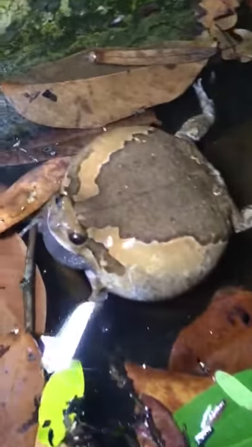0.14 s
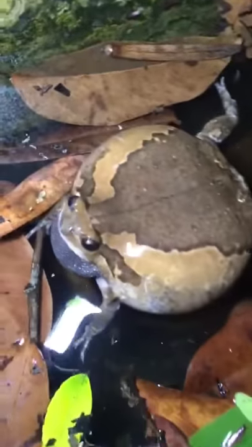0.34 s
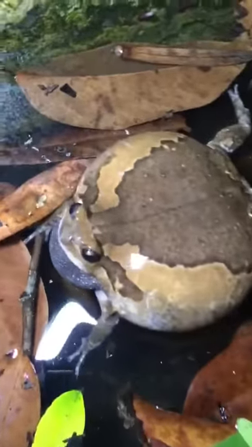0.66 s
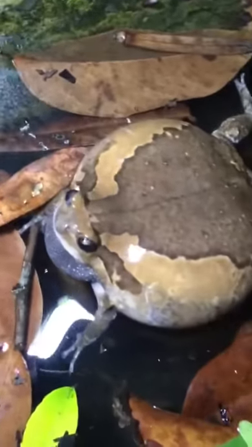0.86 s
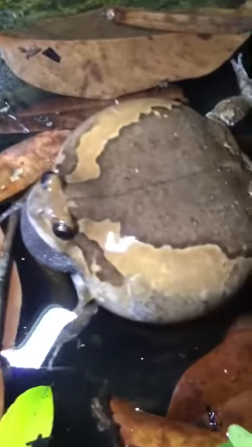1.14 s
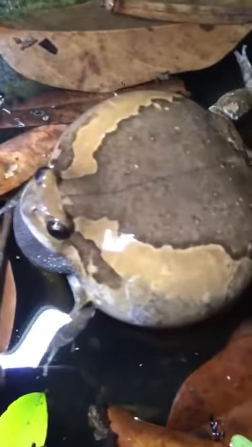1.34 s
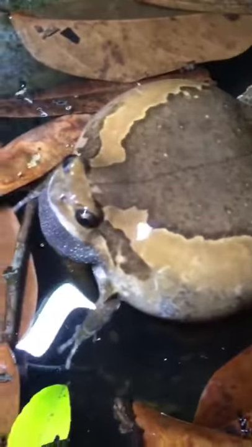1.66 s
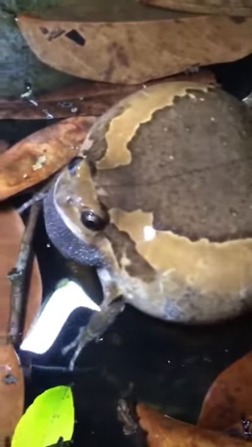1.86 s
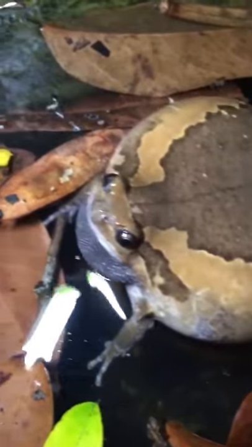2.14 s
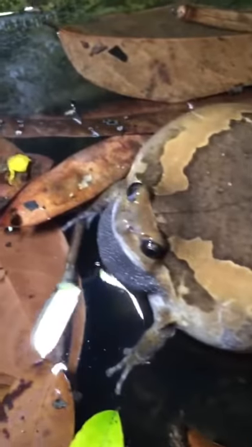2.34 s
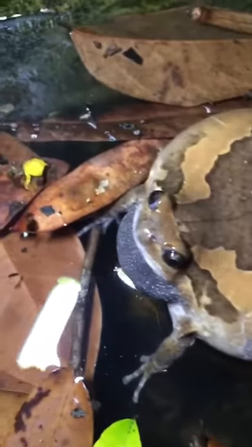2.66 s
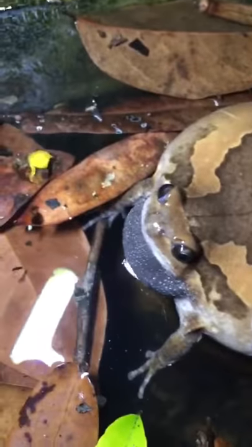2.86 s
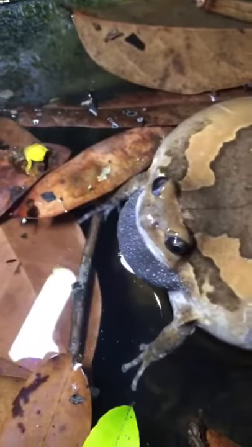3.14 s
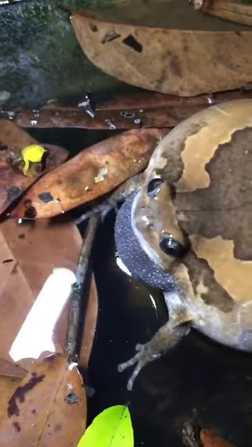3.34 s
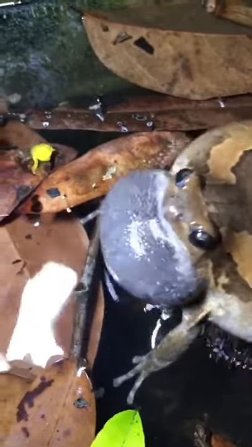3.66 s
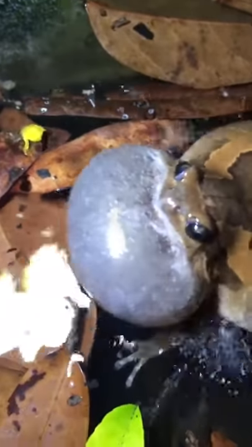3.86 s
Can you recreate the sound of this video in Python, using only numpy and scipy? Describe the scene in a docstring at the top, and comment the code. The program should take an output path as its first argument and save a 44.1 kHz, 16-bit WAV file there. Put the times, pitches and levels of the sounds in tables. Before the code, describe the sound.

Several frogs bellow in turn around a pond at night, their deep drones overlapping over a steady high insect hiss. Near the end, one frog right by the microphone joins with a louder call that turns to a rattle.

```python
"""Bullfrog pond at night

Bullfrogs bellow in turn, larynx pulses driving their vocal sacs into drones that overlap and beat.
At the end a frog right up close inflates its sac and joins in, breaking into a half-rate rattle.
Shrill insects hiss throughout, with one close trill and a few faint falling whistles.
Low gulps, wet ticks, leaf rustles and a far frog chorus sit behind, on a bed of night air."""
import sys
import numpy as np
from scipy import signal
from scipy.io import wavfile
from scipy.ndimage import uniform_filter1d, minimum_filter1d

SR = 44100
rng = np.random.default_rng(int(sys.argv[2]) if len(sys.argv) > 2 else 0)


def master(y):
    """Save y as 16-bit WAV."""
    cut = np.clip(np.atleast_2d(y).T, -1, 1)
    pcm = np.round(cut * 32767)  # scale
    wavfile.write(sys.argv[1], SR, pcm.astype(np.int16))


N = 176400

# The neighbours' calls: drone_db, chest_db, buzz_db, treble_db, ring_db, ring_first_hz, ring_last_hz,
# then a path of (time_s, pulse_rate_hz, effort_db)
BELLOWS = [ (-33.5, -74, -52, -73, 14, 1300, 1327, [(-.1, 138.6, -3), (.1, 140.7, 3.5), (.29, 140.6, -1)]),
           (-32, -47.5, -45.5, -65, 22.5, 1156, 1173, [(-.1, 133.3, -4.5), (.1, 136.2, -3.5),
           (.29, 141.3, -5.5)]), (-33, -41, -42, -71, 21.5, 1411, 1440, [(.24, 120.8, -18), (.4, 123.9, -4),
           (.57, 121.7, -4), (.75, 123.7, -2.5), (1, 129.4, -7)]),
           (-49, -53, -40.5, -74, 2, 2000, 1600, [(.5, 126.7, -0.5), (.65, 125.1, -2.5), (.85, 126.4, -1.5),
           (1.1, 127.6, 5)]), (-35.5, -49.5, -32.5, -73, 10.5, 1760, 1480, [(.68, 139.8, -5.5),
           (.9, 137.5, -3), (1.03, 139.2, -1), (1.15, 143.8, -4), (1.32, 153, -24)]),
           (-25.5, -39, -31.5, -39, 7.5, 1600, 1360, [(.99, 134.8, -6), (1.15, 132.5, 0), (1.24, 132.7, 1),
           (1.36, 135.2, 1.5), (1.5, 138.6, -2), (1.68, 141.8, -11)]),
           (-25, -40, -36, -42, 12, 1330, 1360, [(1.24, 129.3, -3), (1.45, 126.7, 1), (1.62, 129.9, 0),
           (1.78, 134.6, -1.5), (1.94, 135.5, -13)]),
           (-33.5, -52, -47, -84, 13.5, 1340, 1380, [(1.68, 128.8, 4.5), (1.87, 129.1, 3.5),
           (1.98, 124.1, 1.5), (2.22, 126.2, 0)]), (-20, -33, -32, -55, 14, 1415, 1400, [(2.02, 133.8, -9),
           (2.12, 136.2, -4), (2.22, 135.9, 1.5), (2.33, 135.6, 2), (2.5, 139, -.5), (2.65, 143.5, -3),
           (2.76, 147, -10)]), (-30, -40.5, -39.5, -61.5, -5, 1500, 1300, [(2.2, 133.8, 1),
           (2.47, 130.5, -3), (2.72, 132.4, 7.5), (2.92, 135.2, 1.5), (3.12, 136.4, -20)]),
           (-24, -32.5, -33, -43, 3, 1234, 1343, [(2.62, 143.8, -19), (2.7, 142, 0.5), (2.9, 137.8, 1),
           (3.08, 138.9, 1), (3.25, 138.4, -0.5)]),
           (-28, -41.5, -33, -45, 13.5, 1410, 1400, [(2.56, 123.7, -11.5), (2.8, 122.3, 0.5),
           (3.03, 123.6, -1.5), (3.2, 127.2, -4), (3.42, 132.1, -7.5), (3.56, 128.1, -11.5)]),
           (-32, -41, -36.5, -51.5, 5, 1350, 1350, [(3.05, 121, -24), (3.22, 120, -0.5),
           (3.58, 123.8, -2.5)]), (-28.5, -40, -35, -66, -0.5, 1600, 1580, [(3.1, 129, -32.5),
           (3.28, 136.5, -1.5), (3.38, 140, 2), (3.56, 135.7, -1)]), ]
# EQ of a bellow's sac drone, chest and nasal buzz: frequency_hz, gain_db
DRONE_EQ = [(60, -69), (135, -40), (235, 4.5), (280, -1.5), (400, -12.5), (520, -29.5), (800, -67.5)]
CHEST_EQ = [(130, -35.5), (270, -20), (400, -11.5), (540, -4.5), (640, -2.5), (760, 0.5), (950, 4),
            (1100, -5), (1300, -11.5), (2000, -25), (5000, -63)]
BUZZ_EQ = [(200, -52.5), (650, -30.5), (950, -3.5), (1200, 2), (1600, -0.5), (1900, -13.5), (2350, -16.5),
           (3000, -38), (4200, -48), (7000, -76)]
# The near frog's pitch: time_s, pulse_rate_hz
NEAR_PITCH = [(3.5, 102.5), (3.55, 114.6), (3.61, 125.4), (3.72, 127.6), (3.8, 126), (3.9, 127.1),
              (4.05, 124.7)]
# Faders on its layers: time_s, sac_db, chest_db, buzz_db
NEAR_FADERS = [(3.5, -43, -41.5, -59), (3.56, -14, -29, -39), (3.61, -13, -23, -29),
               (3.67, -12, -23.5, -25), (3.735, -8, -23, -23.5), (3.8, -9, -26.5, -27),
               (3.86, -9, -29, -26), (4.05, -11, -39, -25.5)]
# Fader on its nasal ring: time_s, gain_db
NEAR_RING_FADER = [(3.6, -54), (3.7, -28), (3.76, -17.5), (3.83, -17), (3.9, -23), (4, -33)]
# EQ of its sac, chest and buzz: frequency_hz, gain_db
NEAR_SAC_EQ = [(60, -39), (135, -32), (240, 1.5), (400, 9), (700, -16.5), (1500, -40.5), (4000, -74)]
NEAR_CHEST_EQ = [(60, -46), (135, -34), (300, 19), (400, 1.5), (620, 3), (900, -2), (1200, -11.5),
                 (1600, -4.5), (2000, -13.5), (3000, -50), (7000, -53.5)]
NEAR_BUZZ_EQ = [(100, -34), (600, 1), (1000, -5.5), (1300, 6.5), (1420, 6.5), (1550, 1.5), (1720, -10),
                (1920, -6), (2300, -20), (3000, -26.5), (4000, -41.5), (5500, -23.5), (8000, -55),
                (12000, -41), (16000, -60.5)]
# The close insect trill: time_s, pitch_hz, level_db
TRILL = [(.495, 4270, -33.5), (.515, 5300, -25), (.55, 5660, -23), (.62, 5840, -23.5), (.75, 5850, -25.5),
         (.92, 5780, -26), (.935, 6026, -40)]
# Thin whistles, and low gulps as a sac deflates:
# start_s, length_s, first_hz, last_hz, fall_s, level_db, octave_db
WHISTLES = [(1.42, 0.12, 8300, 7040, 0.037, -50.5, -16), (2.192, 0.47, 8700, 7200, .04, -51.5, -10),
            (3.723, 0.57, 10700, 6500, 0.15, -49.5, -30), (3.776, 0.28, 12900, 8200, 0.16, -58, -34)]
GULPS = [(.25, 0.086, 261, 60.6, 0.062, -41, -29), (2.8, .09, 230, 90, .07, -45, -20)]
# Tiny wet ticks: start_s, level_db
TICKS = [(0.577, -41), (.602, -38), (.627, -42), (0.662, -44), (0.699, -44), (0.756, -41)]
# Rustles in the leaves: start_s, length_s, level_db
RUSTLES = [(0.154, 0.12, -56), (0.292, 0.15, -48), (0.474, 0.11, -40), (0.655, 0.13, -43),
           (1.91, 0.11, -43), (2.034, 0.13, -44), (2.215, 0.11, -44)]
# Swells of the insect bed and the far frogs: time_s, level_db
INSECT_FADER = [(0, -35.5), (.4, -27.5), (.95, -29), (1.37, -26.5), (2, -25), (2.88, -29.5), (3.49, -27.5),
                (3.7, -29), (3.89, -42), (4, -41)]
CHORUS_FADER = [(0, -46), (.3, -45), (.9, -39), (1.5, -35), (1.85, -37), (1.97, -47), (2.45, -39),
                (2.72, -27), (3.35, -26), (3.6, -34), (4, -35)]
# EQ of the insects, far frogs, leaves, swelling sac's thud and night air: frequency_hz, gain_db
INSECT_EQ = [(3000, -57.5), (4600, -30.5), (5050, -21.5), (5400, -4.5), (5850, 3), (6200, -0.5),
             (6550, -11), (6950, -24.5), (7800, -68), (10200, -61), (11700, -33.5), (13200, -65),
             (16000, -61)]
CHORUS_EQ = [(130, -32), (200, -7), (260, -10.5), (380, 1.5), (600, -14.5), (950, 1), (1350, -18),
             (1650, 2), (2000, -7.5), (3000, -28.5), (5000, -44)]
RUSTLE_EQ = [(600, -46.5), (1800, -25), (2550, 8), (3100, -6.5), (3700, -7.5), (5000, -13), (8000, -50.5)]
THUD_EQ = [(20, -11), (55, -7), (130, -1), (300, -26.5), (1000, -56)]
AIR_EQ = [(20, -17.5), (50, -4), (90, -2), (180, -7), (500, 1), (2400, -18.5), (3400, -11), (4300, -16.5),
          (7500, -35), (16000, -35)]
# EQ of the near frog's weak pulses and of the feed to its ring: frequency_hz, gain_db
WEAK_PULSE_EQ = [(300, -1.5), (900, -0.5), (1900, -0.5), (2800, -6), (6000, -35)]
NEAR_RING_EQ = [(300, -31.5), (1200, 9.5), (2000, -3.5), (4000, -21.5)]

CALL_FADE_S = .018


def bellow(drone_db, chest_db, buzz_db, treble_db, ring_db, ring_first_hz, ring_last_hz, path):
    """Larynx pulses drive the sac's drone and a nasal buzz with a gliding ring."""
    t = np.arange(path[0][0], path[-1][0], 1 / SR)
    rate_hz, effort_db = curve(path, t)
    rate_hz = uniform_filter1d(rate_hz, size=3500, mode="nearest") * (1 + .001 * wander(t, 25))
    drive = pulses(np.cumsum(rate_hz) / SR) * (1 + .025 * wander(t, 150))
    drive *= np.clip(np.minimum(t - t[0], t[-1] - t) / CALL_FADE_S, 0, 1)
    voice = amp(chest_db) * colour(drive, CHEST_EQ) + amp(buzz_db) * colour(drive, BUZZ_EQ)
    glide = (1 + np.tanh((t - t.mean()) / .058)) / 2  # a quick slide in mid-call
    ring_hz = ring_first_hz + (ring_last_hz - ring_first_hz) * glide
    voice += amp(ring_db) * resonate(voice, ring_hz, width_hz=75.5)
    treble = resonate_twice(drive, hz=2175, width_hz=430)
    voice += amp(treble_db + 2.05 * effort_db) * treble  # pushing harder brightens the call
    water_echo_s = .001185 * (1 + rng.random())
    voice += amp(-6.5) * np.interp(t - water_echo_s, t, voice)
    drone = amp(drone_db + .89 * effort_db) * colour(drive, DRONE_EQ)
    return t[0], amp(effort_db) * voice + drone


def near_frog(broken_s=3.8132, break_fade_s=.045, weak_early_s=.0007, leaf_echo_s=.00378):
    """Pulses keep the swollen sac ringing; as the buzz hardens, every second pulse falters."""
    t = np.arange(N) / SR
    sac_db, chest_db, buzz_db = curve(NEAR_FADERS, t)
    rate_hz = curve(NEAR_PITCH, t)[0] * (1 + .006 * wander(t, 130))
    turns = np.cumsum(rate_hz) / SR
    turns -= np.interp(broken_s, t, turns)  # a strong pulse lands as the break completes
    fade_in = np.clip((t - NEAR_FADERS[0][0]) / CALL_FADE_S, 0, 1)
    drive = pulses(turns, count=120) * fade_in * (1 + .04 * wander(t, 130))
    # The rattle: odd pulses turn softer, duller, uneven and a little early.
    broken = np.clip((t - broken_s) / break_fade_s + 1, 0, 1)
    weak_gate = broken * (np.round(turns) % 2)
    weak_pulses = np.interp(t + weak_early_s, t, drive * weak_gate) * (1 + .28 * wander(t, 70))
    drive = drive * (1 - weak_gate) + amp(-8) * colour(weak_pulses, WEAK_PULSE_EQ)
    sac = resonate(colour(drive * amp(sac_db), NEAR_SAC_EQ), hz=259.3, width_hz=17)
    chest = colour(drive * amp(chest_db), NEAR_CHEST_EQ)
    buzz = colour(drive * amp(buzz_db), NEAR_BUZZ_EQ)
    ring_feed = colour(drive * amp(curve(NEAR_RING_FADER, t)[0]), NEAR_RING_EQ)
    buzz += resonate(ring_feed, hz=1544, width_hz=98)
    leaf_echo = amp(-14.5) * np.interp(t - leaf_echo_s, t, buzz)
    return buzz + leaf_echo - sac - chest


def insects(flutter=.06, flutter_hz=170):
    """Countless shrill trills merge into a fluttering band of hiss."""
    t = np.arange(N) / SR
    band = colour(rng.standard_normal(N), INSECT_EQ) * (1 + flutter * wander(t, flutter_hz))
    return amp(curve(INSECT_FADER, t)[0]) * unit(band)


def trill(rate_hz=84.3, sweep_hz=650, scatter_hz=50, octave_db=-38):
    """One close insect: a fast train of tiny upward chirps that climbs to its pitch."""
    t = np.arange(TRILL[0][0], TRILL[-1][0], 1 / SR)
    pitch_hz, level_db = curve(TRILL, t)
    pitch_hz += scatter_hz * wander(t, 90)
    cycle = (t - t[0]) * rate_hz % 1
    phase = 2 * np.pi * (pitch_hz + sweep_hz * (cycle - 1) / 2) * cycle / rate_hz
    tone = np.sin(phase) + amp(octave_db) * np.sin(2 * phase)
    return t[0], amp(level_db) * unit(np.sin(np.pi * cycle) ** 2 * tone)


def falling_tone(start_s, length_s, first_hz, last_hz, fall_s, level_db, octave_db):
    """A whistle or gulp that starts raspy, slides down and settles."""
    t = np.arange(0, length_s, 1 / SR)
    fall = np.exp(-t / fall_s)
    rasp = 1 + .06 * fall * wander(t, 1500) + .014 * wander(t, 1400)
    pitch_hz = (last_hz + (first_hz - last_hz) * fall) * rasp
    phase = 2 * np.pi * np.cumsum(pitch_hz) / SR
    tone = np.sin(phase) + amp(octave_db) * np.sin(2 * phase)
    return start_s, amp(level_db) * np.sin(np.pi * t / length_s) ** .22 * tone


def tick(start_s, level_db, decay_s=.012):
    """A wet tick: a pinch of bright noise that dies at once."""
    t = np.arange(2048) / SR
    burst = resonate_twice(rng.standard_normal(len(t)), hz=7740, width_hz=850)
    return start_s, amp(level_db) * unit(burst) * np.exp(-t / decay_s)


def swish(start_s, length_s, level_db, eq):
    """A soft swell of grainy noise: a rustle when bright, a thud when dark."""
    t = np.arange(0, length_s, 1 / SR)
    envelope = amp(2 * wander(t, 120)) * np.sin(np.pi * t / length_s)
    return start_s, amp(level_db) * unit(colour(rng.standard_normal(len(t)) * envelope, eq))


def far_chorus(count=36, length_s=.85, low_hz=118, high_hz=145, sag=.035):
    """Many distant frogs washed in echo, each sagging in pitch in mid-call."""
    calls, t = np.zeros(N), np.arange(0, length_s, 1 / SR)
    arch = np.sin(np.pi * t / length_s)
    for slot, (offset, pitch) in enumerate(rng.random((count, 2))):
        rate_hz = (low_hz + pitch * (high_hz - low_hz)) * (1 + sag * (t / length_s - arch))
        start_s = (slot + offset) / count * (N / SR + length_s) - length_s
        add(calls, start_s, np.sqrt(arch) * pulses(np.cumsum(rate_hz) / SR))
    chorus = colour(calls + .78 * pond_echoes(calls), CHORUS_EQ)
    return amp(curve(CHORUS_FADER, np.arange(N) / SR)[0]) * unit(chorus)


def night_air(level_db=-44.5):
    """A steady bed of soft, dark noise."""
    return amp(level_db) * unit(colour(rng.standard_normal(N), AIR_EQ))


def pond_echoes(x, t60_s=.3, predelay_s=.004, density=.05):
    """Scattered echoes from banks and leaves."""
    t = np.arange(SR // 2) / SR
    taps = rng.standard_normal(len(t)) * (rng.random(len(t)) < density)
    taps *= (t > predelay_s) * amp(-60 * t / t60_s)
    return signal.fftconvolve(x, taps / np.linalg.norm(taps))[:N]


def pulses(turns, count=48):
    """One sharp pulse per turn, built from equal harmonics of rms one."""
    half_phase = np.pi * (turns % 1) + 1e-9
    return (np.sin((2 * count + 1) * half_phase) / np.sin(half_phase) - 1) / np.sqrt(2)


def resonate(x, hz, width_hz):
    """A unity-gain resonance whose pitch can glide."""
    turn = np.exp(2j * np.pi * np.cumsum(hz * np.ones(len(x))) / SR)
    pole = np.exp(-np.pi * width_hz / SR)
    return 2 * (turn * signal.lfilter([1 - pole], [1, -pole], x / turn)).real


def resonate_twice(x, hz, width_hz):
    """Two resonances in series, for steeper skirts."""
    return resonate(resonate(x, hz, width_hz), hz, width_hz)


def colour(x, eq, size=4096):
    """Minimum-phase EQ through the given points."""
    points_hz, gain_db = np.transpose(eq)
    hz = abs(np.fft.fftfreq(size, 1 / SR))
    log_gain = np.log(amp(np.interp(np.log(hz + 1), np.log(points_hz), gain_db)))
    taps = np.fft.ifft(np.exp(np.conj(signal.hilbert(log_gain)))).real
    return signal.fftconvolve(x, taps[:size // 2])[:len(x)]


def wander(t, hz):
    """Random drift that changes at about the given rate."""
    knots = rng.standard_normal(1024)
    return np.interp((t - t[0]) * hz, np.arange(len(knots)), knots)


def curve(rows, t):
    """One automation lane per value column, ramping straight between points."""
    times_s, *columns = np.transpose(rows)
    return [np.interp(t, times_s, column) for column in columns]


def amp(db):
    """Decibels to gain."""
    return 10 ** (np.asarray(db) / 20)


def unit(x):
    """Scales to an rms of one."""
    return x / np.sqrt(np.mean(x ** 2) + 1e-20)


def add(mix, start_s, sound):
    """Drops a sound into the mix, trimming any overhang."""
    at = round(start_s * SR)
    sound = sound[max(-at, 0):]
    part = mix[max(at, 0):][:len(sound)]
    part += sound[:len(part)]


def scene(around_send_db=-15, near_send_db=-24):
    """Neighbours and the drier near frog over the choruses and the night air."""
    around = np.zeros(N)
    for row in BELLOWS:
        add(around, *bellow(*row))
    for row in GULPS + WHISTLES:
        add(around, *falling_tone(*row))
    for row in TICKS:
        add(around, *tick(*row))
    for row in RUSTLES:
        add(around, *swish(*row, RUSTLE_EQ))
    add(around, *swish(start_s=3.775, length_s=.11, level_db=-42.5, eq=THUD_EQ))  # the sac swells
    add(around, *trill())
    near = near_frog()
    air = night_air()
    echoes = pond_echoes(amp(around_send_db) * around + amp(near_send_db) * near)
    return (around + near + echoes + far_chorus() + insects() + air)[None]


def record(dry, ceiling=1, cutoff_hz=15800):
    """A fast limiter holds the loudest peaks; a steep low-pass trims the very top."""
    gain = minimum_filter1d(ceiling / np.maximum(abs(dry), ceiling), size=400)
    limited = dry * uniform_filter1d(gain, size=400)
    lowpass = signal.firwin(511, cutoff_hz, window=("kaiser", 9), fs=SR)
    return signal.oaconvolve(limited, lowpass[None], "same")


dry = scene()
out = record(dry)
master(out)
```